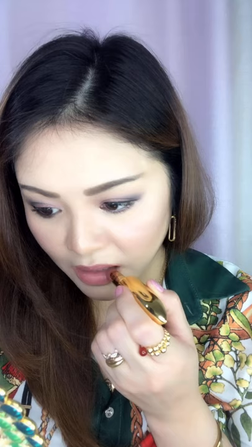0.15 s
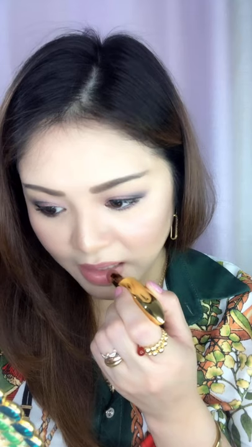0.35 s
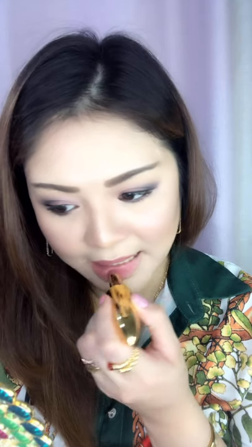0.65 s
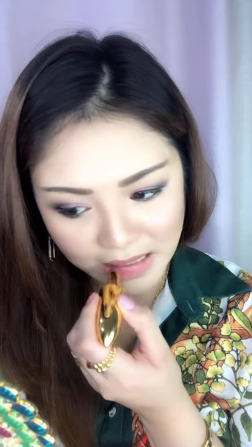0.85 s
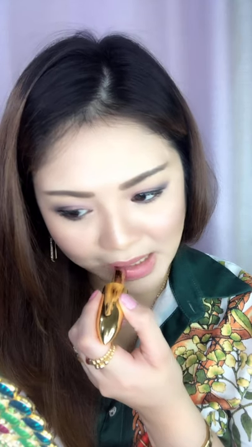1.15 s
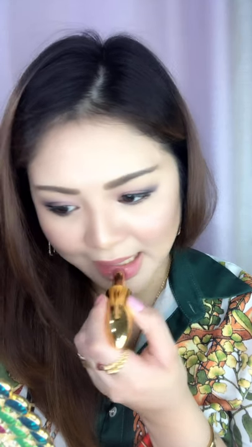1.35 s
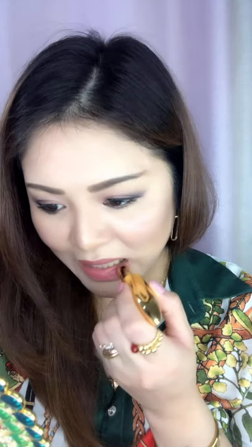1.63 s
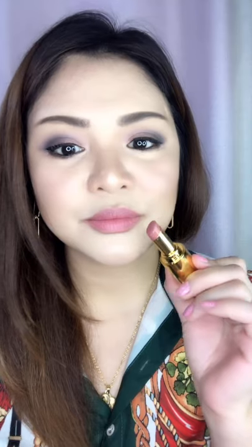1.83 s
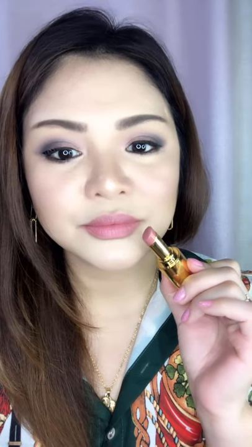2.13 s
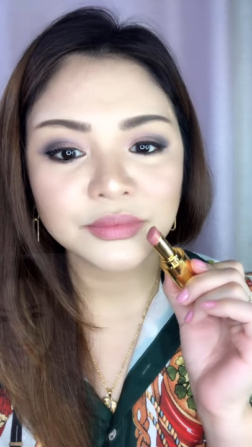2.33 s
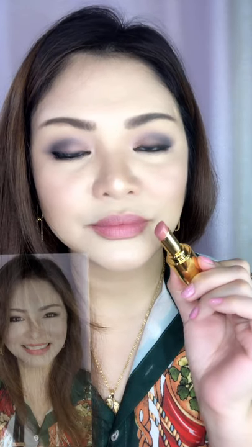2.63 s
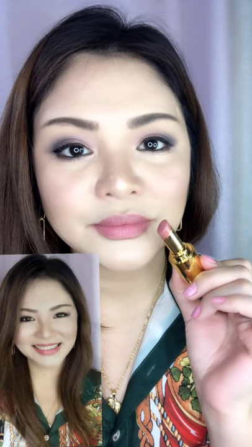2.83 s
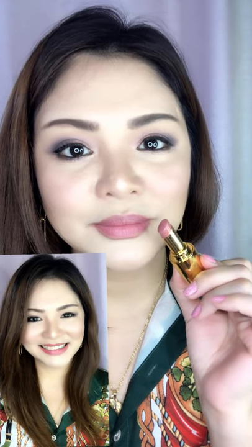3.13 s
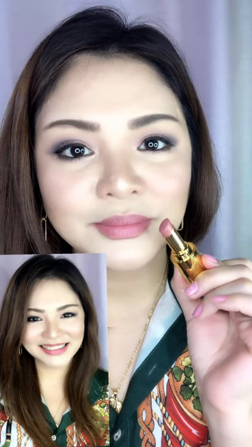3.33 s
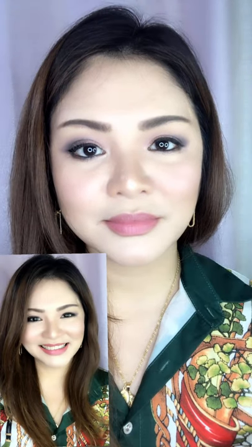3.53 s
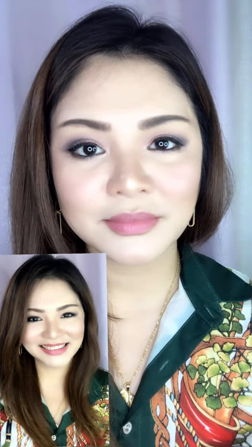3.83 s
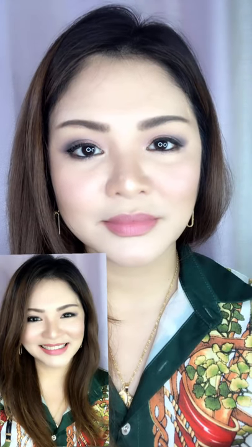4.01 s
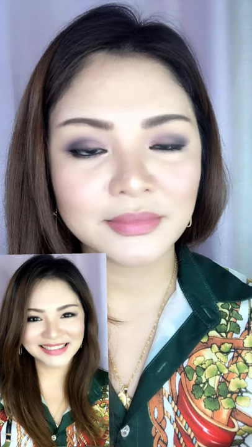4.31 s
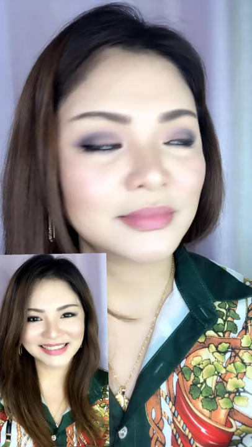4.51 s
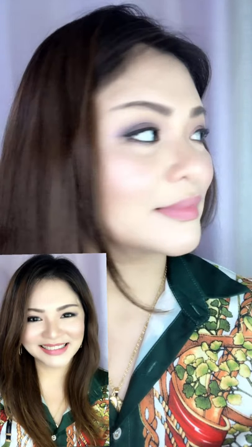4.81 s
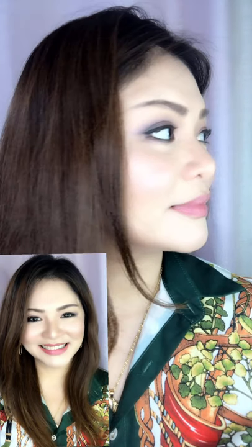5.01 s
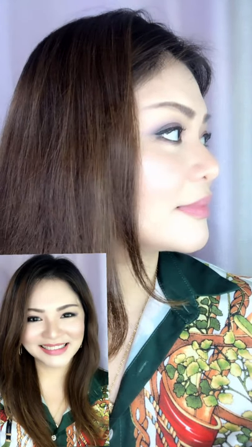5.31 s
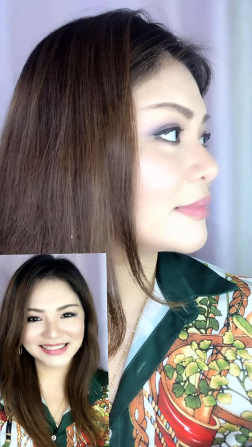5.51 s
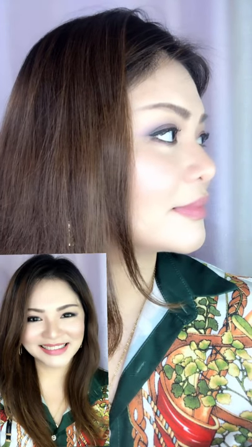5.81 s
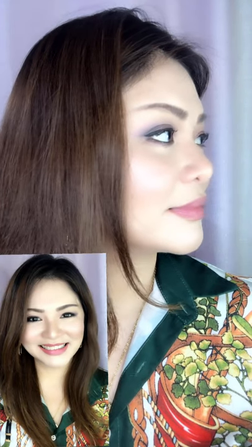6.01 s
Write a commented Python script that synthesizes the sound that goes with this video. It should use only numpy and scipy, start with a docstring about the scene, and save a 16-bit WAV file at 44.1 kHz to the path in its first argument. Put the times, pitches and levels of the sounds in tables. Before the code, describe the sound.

Indoor compressor drone and soft airy fan, light clicks and one dry snap, a muffled vehicle slowing and revving outside, sound briefly fading out three times.

```python
"""A room with a refrigeration unit running: a deep compressor tone, a buzz of motor tones with thin whines
(frequency-wavering sines) and a fan (shaped noise). A motor vehicle drones outside, slowing and picking up
again (harmonics of a gliding cycle rate); light clicks and clacks come from across the room (noise under
decaying envelopes), with one dry snap close by. Three times the whole sound fades to nothing and straight back."""
import sys
import numpy as np
from scipy import signal
from scipy.fft import rfft, irfft
from scipy.io import wavfile

SR = 44100
rng = np.random.default_rng(int(sys.argv[2]) if len(sys.argv) > 2 else 0)


def unload_audio(sound):
    """Save the sound as a 16-bit wav file, at the path given as the first command line argument."""
    columns = np.transpose(np.atleast_2d(sound))
    # keep every value between -1 and 1, then stretch to whole-number steps
    steps = np.round(np.clip(columns, -1, 1) * 32767)
    wavfile.write(sys.argv[1], SR, steps.astype(np.int16))


N = 271215
T = np.arange(N) / SR  # time in seconds


def amp(db):
    """Decibels are a logarithmic measure: 20 dB is a factor of ten in amplitude."""
    return 10 ** (np.asarray(db) / 20)


def unit(x):
    """Normalisation: equal mean power gives every signal an RMS of one."""
    return x / np.sqrt(np.mean(x ** 2) + 1e-20)


def noise(shape):
    """Spectral filtering: white noise times the function shape(Hz), at unit RMS."""
    spectrum = rfft(rng.standard_normal(N))
    hz = np.fft.rfftfreq(N, 1 / SR)
    return unit(irfft(spectrum * shape(hz), N))


def coloured(points):
    """Spectral colour: unit noise whose dB are interpolated over log frequency through (Hz, dB) points."""
    hz, db = np.transpose(points)
    return noise(lambda f: amp(np.interp(np.log(f + 1), np.log(hz), db)))


def drift(rate_hz):
    """Random modulation: unit low-passed noise, halved in amplitude at rate_hz."""
    return noise(lambda f: 1 / (1 + (f / rate_hz) ** 4))


def throb_db(steady_db=-32, waver_db=0.05):
    """Amplitude modulation: the deep tone wavers slightly and swells as the engine goes by."""
    # Swells as the engine's second harmonic joins the deep tone.
    # Each row: top in seconds, gain in dB, rise in seconds, decay in seconds.
    swells = [(1.82, 8.5, 0.11, .27), (3.12, 4, .09, 0.042)]
    db = steady_db + waver_db * drift(5.4)
    for top, gain_db, rise, decay in swells:
        before = ((top - T) / rise) ** 2
        after = (T - top) / decay
        db = db + gain_db * np.exp(-np.where(T < top, before, after))
    return db


def hum(rotor_hz=57.6, waver_turns=0.049, flutter_db=1.5):
    """Periodic machine motion gives line spectra: the compressor's deep tone and steady motor tones."""
    # Tones of the motors and casing. Each row: frequency in Hz, mean RMS level in dB.
    tones = [(157.1, -51.5), (230.5, -51.5), (240.16, -39.5), (256, -55), (400, -55), (506, -63),
             (540.3, -64), (576, -58), (634.1, -71), (662.6, -63.5), (749.2, -63), (1002.5, -66.5),
             (1211, -63), (1268.5, -73), (1440, -70.5), (1499.3, -65.5), (1672.5, -66), (1730.2, -70),
             (2077, -70), (2998, -74), (3402, -80.5), (3806, -75), (3865, -83), (3920, -75), (4323, -81)]
    out = amp(throb_db()) * np.sin(2 * np.pi * rotor_hz * T)
    for hz, db in tones:
        loose = min(hz / 1200, 1)  # the high whines waver most
        turns = hz * T + rng.random() + waver_turns * loose * drift(3.0)
        level = amp(db + flutter_db * loose * drift(13))
        out = out + level * np.sin(2 * np.pi * turns)
    return np.sqrt(2) * out


def fan(air_db=-42.5, gust_db=0.5):
    """Turbulence is broadband: an uneven rush of air, with duct resonances as fuzzy notes."""
    # Spectrum of the rush. Each row: frequency in Hz, relative density in dB per Hz.
    air = [(10, -18), (29, -3.5), (60, 6.5), (95, -5.5), (135, 3.5), (190, 2.5), (270, -2), (325, -13.5),
           (520, -10), (820, -14), (1300, -17), (1900, -18), (3200, -25.5), (4200, -31), (5500, -37.5),
           (9500, -39), (12000, -44.5), (15000, -48)]
    # Duct resonances that the air excites. Each row: frequency in Hz, width in Hz, RMS level in dB.
    duct = [(389, 33, -51.5), (159.3, 7, -50.5), (516, 44, -60), (817, 89, -59.5), (1715, 34, -68),
            (3990, 140, -75)]
    out = amp(air_db + gust_db * drift(42)) * coloured(air)
    for hz, width, db in duct:
        out = out + amp(db) * noise(lambda f: 1 / (1 + ((f - hz) / width * 1.22) ** 2))
    return out


def blows(rows, rise, ring_t60, room_db, room_t60):
    """Incoherent sounds add in power: the envelope of blows, each a short ring and the room's tail."""
    t = T[:SR // 2]
    ring = amp(-60 * t / ring_t60)
    tail = amp(room_db - 60 * t / room_t60)
    power = (1 - np.exp(-t / rise)) ** 2 * (ring ** 2 + tail ** 2)
    total = np.zeros(N)
    for s, db in rows:
        part = total[round(s * SR):][:len(t)]  # a view: adding to it adds to total
        part += amp(db) ** 2 * power[:len(part)]
    return np.sqrt(total)


def faint_knocks(count=40, per_s=3, spread_db=3):
    """Jittered timing: one faint knock at a random moment of each equal interval, of random strength."""
    # Mean strengths of a faint knock: dull ring in dB, light tick in dB, bright crack in dB.
    mean_db = np.array((-50, -65.5, -69))
    draws = rng.random((count, 2))
    times = (np.arange(count) + draws[:, 0]) / per_s
    rows = []
    for s, u in zip(times, draws[:, 1]):
        if s < T[-1]:
            rows.append((s, *(mean_db + spread_db * (2 * u - 1))))
    return rows


def clatter():
    """Impact and reverberation: small hard things across the room, heard mostly through their reflections."""
    # Knocks. Each row: start in seconds, then strengths of dull ring, light tick and bright crack in dB.
    clacks = [(.289, -53, -55.5, -70), (.54, -46.5, -60, -68), (.849, -45.5, -57, -66),
              (1.18, -48, -51.5, -64), (1.2, -43, -62, -52), (1.378, -44, -52.5, -60),
              (1.871, -46, -52, -62), (1.964, -45, -58, -66), (2.049, -46, -55, -68),
              (2.304, -49.5, -54, -68), (2.588, -44.5, -54.5, -59), (2.899, -45.5, -62, -57),
              (3.055, -44.5, -49, -64), (3.089, -42.5, -49, -60), (3.221, -49, -51, -66),
              (3.243, -43.5, -64, -53), (3.361, -49.5, -56, -63), (3.664, -44.5, -53.5, -56),
              (4.06, -47.5, -52.5, -72), (4.402, -49.5, -59, -69), (4.474, -41.5, -51, -64),
              (4.498, -54, -62, -62), (5.066, -49, -61, -68), (5.147, -53, -58, -72),
              (5.808, -48, -68, -57), (5.927, -52, -57, -70)]
    # Spectra of tick, dull ring and crack. Each row: frequency in Hz, relative density in dB per Hz.
    tick_colour = [(400, -13), (2500, -36), (4500, -3), (5600, -1), (6500, 5), (7300, -1), (8300, 5.5),
                   (9500, -9.5), (14000, -18)]
    ring_colour = [(200, -18), (600, 7), (1000, 7), (1150, 4), (1550, 3.5), (1700, 10), (1850, 3),
                   (2700, -2.5), (4200, -13), (8500, -19), (14000, -43)]
    crack_colour = [(1000, -8), (3000, -6), (9000, 1), (13000, -3), (16000, -10)]
    s, ring_db, tick_db, crack_db = np.transpose(list(clacks) + faint_knocks())
    # rises and decays in seconds; room_db is relative to the direct ring
    ticks = blows(zip(s, tick_db), rise=0.00036, ring_t60=0.038, room_db=-9.0, room_t60=0.23)
    rings = blows(zip(s, ring_db), rise=0.0045, ring_t60=0.1, room_db=-0.5, room_t60=0.45)
    cracks = blows(zip(s, crack_db), rise=0.00069, ring_t60=0.043, room_db=-11.5, room_t60=0.24)
    knocks = ticks * coloured(tick_colour) + rings * coloured(ring_colour) + cracks * coloured(crack_colour)
    # reflections arrive in clumps, which makes each tail grainy
    return knocks * unit(amp(1.06 * drift(250)))


def snap(start_s=1.0725, push_db=-27.5, decay_s=.00004, rattle_db=-14, rattle_decay_s=.0005):
    """A brief impulse has a wide spectrum: one sharp push and a moment of rattle, then a band-pass."""
    age = np.arange(N) - round(start_s * SR)
    t = abs(age) / SR
    rattle = amp(rattle_db) * np.exp(-t / rattle_decay_s) * rng.standard_normal(N)
    push = amp(push_db) * (age >= 0) * (np.exp(-t / decay_s) + rattle)
    band = signal.butter(3, [1500, 10800], "bandpass", fs=SR, output="sos")
    return signal.sosfilt(band, push)


def boom_level(rise_s=0.091, release_s=0.098, sag_db_per_s=-2.5, idle_db=-52.5):
    """Amplitude envelope under load: each exhaust boom rises, sags while it holds, and dies back to idle."""
    # Booms under load. Each row: start in seconds, hold in seconds, level at the start in dB.
    loads = [(1.865, 0.8, -36), (3.988, .04, -46), (4.7, 0.55, -46)]
    level = amp(idle_db)
    for s, hold, db in loads:
        age = T - s
        edges = np.exp(-(np.minimum(age, 0) / rise_s) ** 2 - np.maximum(age - hold, 0) / release_s)
        sagging = amp(db + sag_db_per_s * np.clip(age, 0, hold))
        level = np.maximum(level, edges * sagging)
    return level


def room_lift(hz):
    """Modal resonance: the room lifts the engine's harmonics as they glide through its modes."""
    # Room modes. Each row: frequency in Hz, width in Hz, gain in dB.
    modes = [(157.4, 9.1, 3), (225, 12, 4)]
    return amp(sum(db / (1 + (2 * (hz - mode_hz) / width) ** 2) for mode_hz, width, db in modes))


def engine(rows, jitter=0.0018):
    """A repeating cycle sounds as harmonics of its rate; the walls keep out all but the low ones."""
    # Harmonics of the exhaust boom, then of the upper drone.
    # Each row: multiple of the rate, relative level in dB.
    boom = [(1, -17), (3, -6.5), (4, -3)]
    drone = [(5, -1.5), (6, -5.5), (7, -4.5), (8, -8)]
    s, rate, drone_db = np.transpose(rows)
    speed = np.interp(T, s, rate)
    turns = np.cumsum(speed * (1 + jitter * drift(9.8))) / SR
    present = np.clip(np.minimum(T - s[0], s[-1] - T) / 0.033 + 1, 0, 1)  # 33 ms ramps outside the rows
    drone_level = amp(np.interp(T, s, drone_db))
    out = np.zeros(N)
    for harmonics, level in ((boom, boom_level()), (drone, drone_level)):
        for k, db in harmonics:
            tone = np.sin(2 * np.pi * (k * turns + rng.random()))
            out += level * amp(db) * room_lift(k * speed) * tone
    return np.sqrt(2) * present * out


def scene():
    """Superposition: the pressures of all the sources add."""
    # Engine outside, one table a stretch.
    # Each row: time in seconds, cycle rate in Hz, upper drone level in dB.
    stretches = [
        [(1.66, 30.97, -57), (1.9, 29.36, -56), (2.1, 28.18, -40.5), (2.4, 27.7, -55), (2.76, 26.8, -53),
         (3.22, 31.8, -42.5), (3.5, 32.15, -47)],
        [(3.95, 27.5, -58), (4.15, 27.5, -57), (4.7, 23.6, -56), (5.12, 26.7, -43.5), (5.5, 28.2, -41),
         (5.85, 27.3, -48), (6.15, 26.6, -49)],
    ]
    vehicle = sum(engine(rows) for rows in stretches)
    return (hum() + fan() + clatter() + snap() + vehicle)[None]


def record(dry, cut_s=0.0011, fall_s=0.15, last_db=-21, rise_s=.155, in_curve=1.75):
    """Gain and linear filtering: each fade slides down, cuts to silence and swells back; then a low-pass."""
    # Fades through silence. Each row: stop of the sound in seconds, its new start in seconds.
    fades = [(0.116, 0.122), (1.648, 1.658), (3.489, 3.489)]
    gain = np.ones(N)
    for stop, start in fades:
        slide = np.clip(amp(last_db) + (stop - T) / fall_s, 0, 1)
        going = np.clip((stop - T) / cut_s, 0, 1) * slide
        gain *= going + np.clip((T - start) / rise_s, 0, 1) ** in_curve
    low_pass = signal.firwin(151, 15000, window=("kaiser", 9), fs=SR)  # edge in Hz
    return signal.oaconvolve(dry * gain, low_pass[None], "same")


dry = scene()
out = record(dry)
unload_audio(out)
```